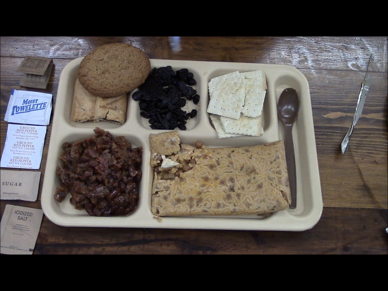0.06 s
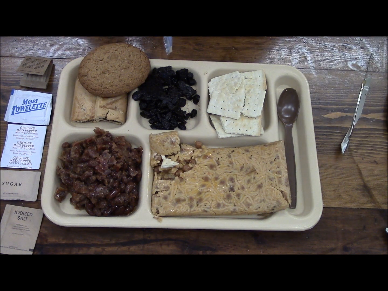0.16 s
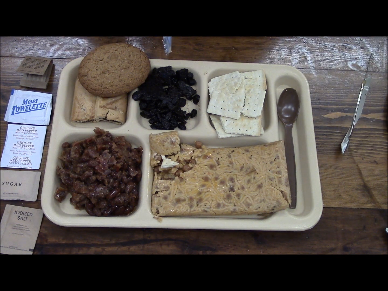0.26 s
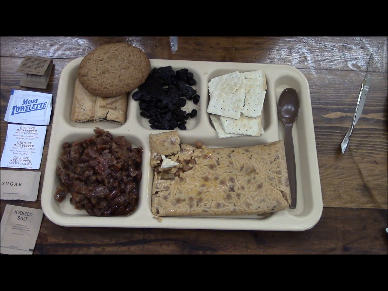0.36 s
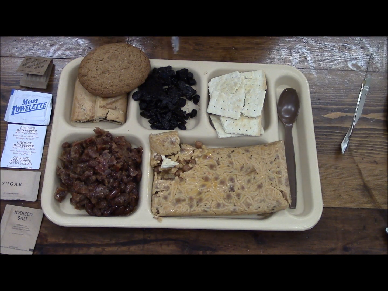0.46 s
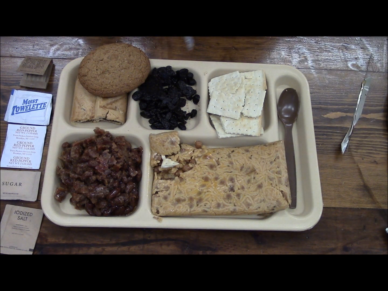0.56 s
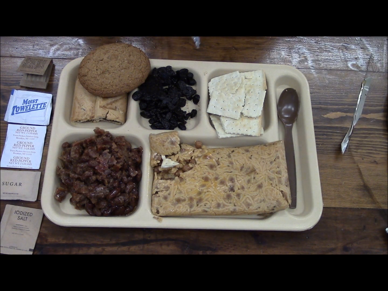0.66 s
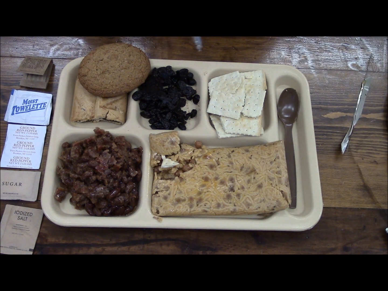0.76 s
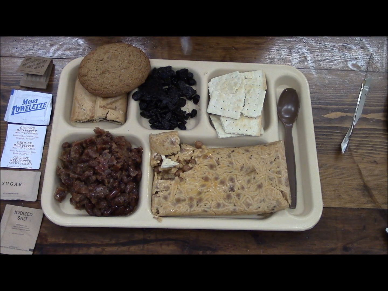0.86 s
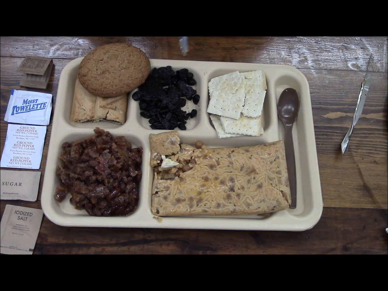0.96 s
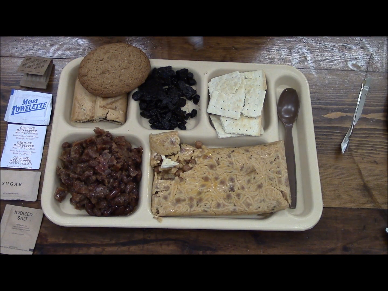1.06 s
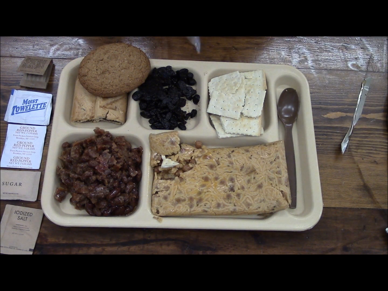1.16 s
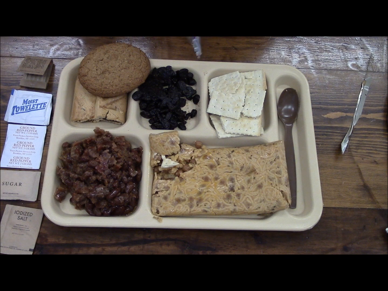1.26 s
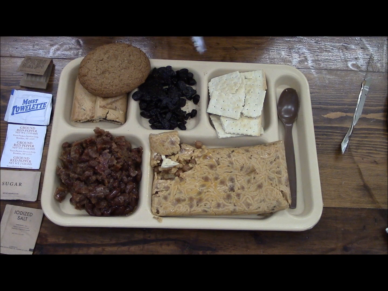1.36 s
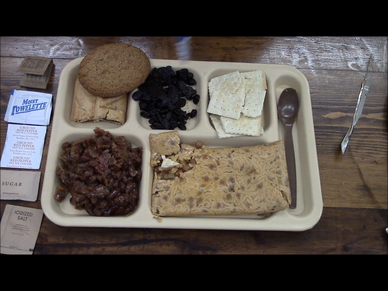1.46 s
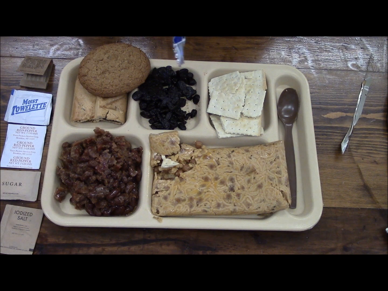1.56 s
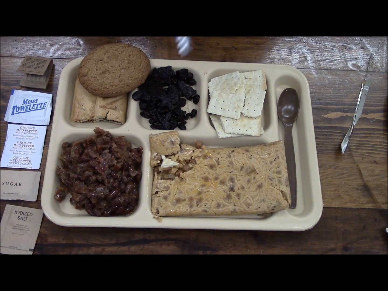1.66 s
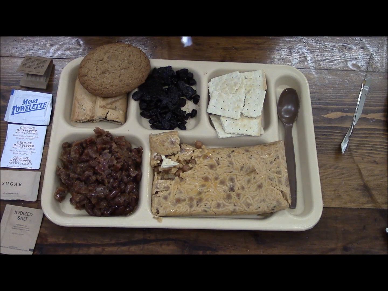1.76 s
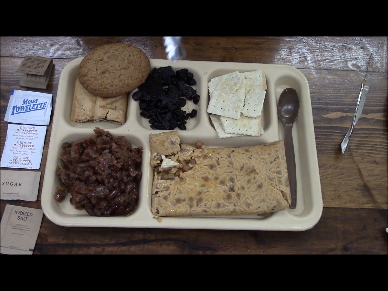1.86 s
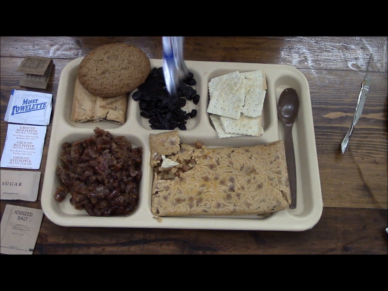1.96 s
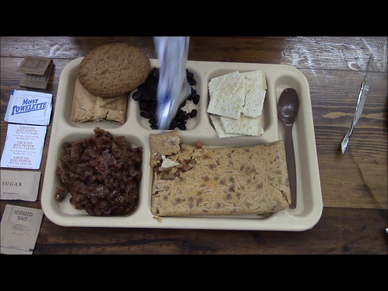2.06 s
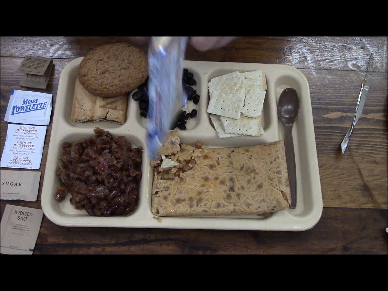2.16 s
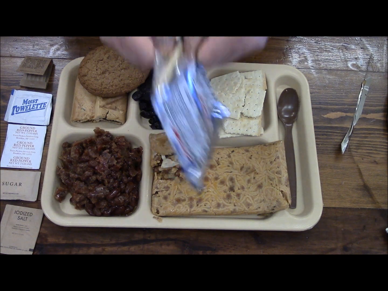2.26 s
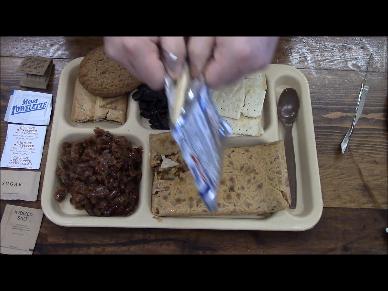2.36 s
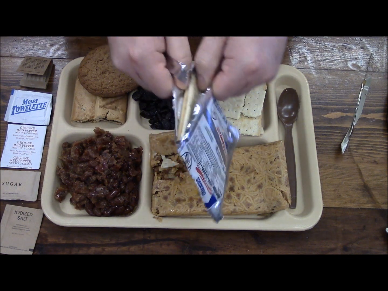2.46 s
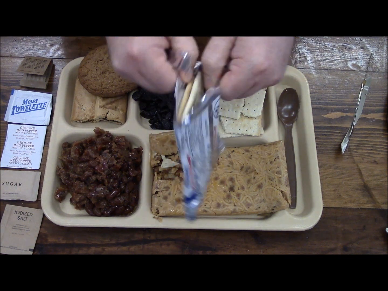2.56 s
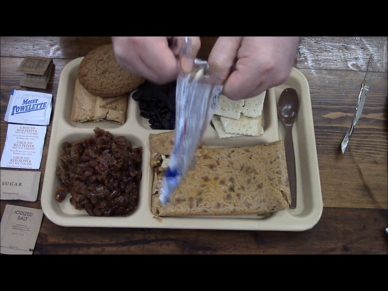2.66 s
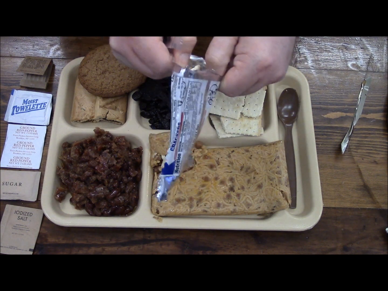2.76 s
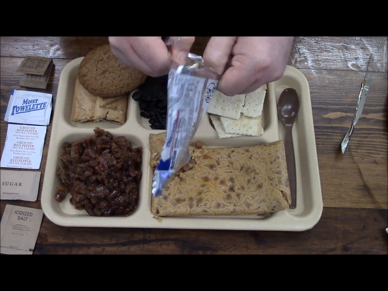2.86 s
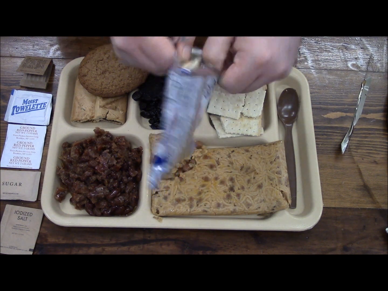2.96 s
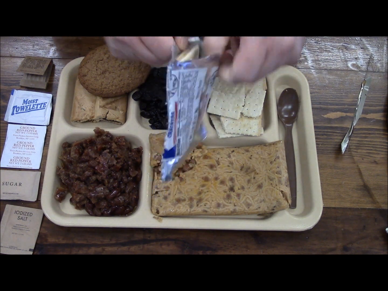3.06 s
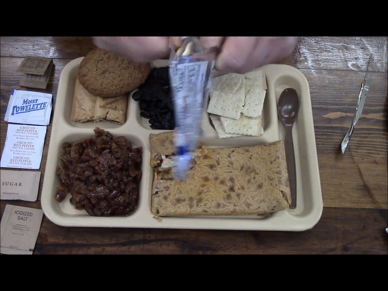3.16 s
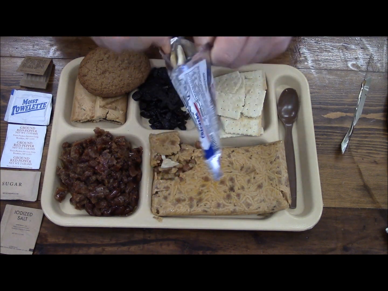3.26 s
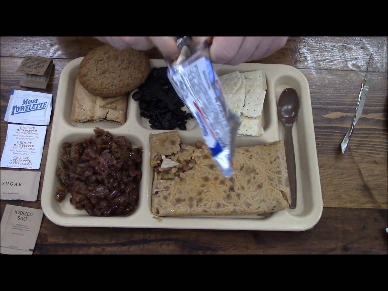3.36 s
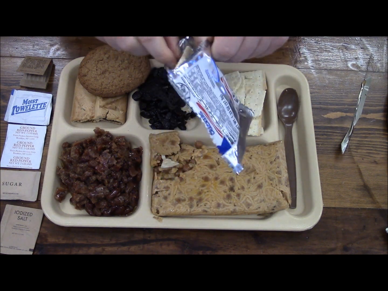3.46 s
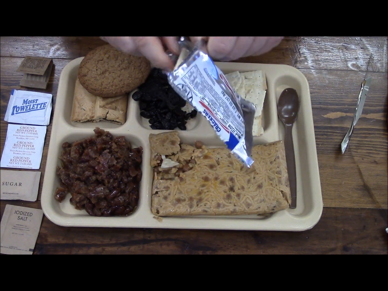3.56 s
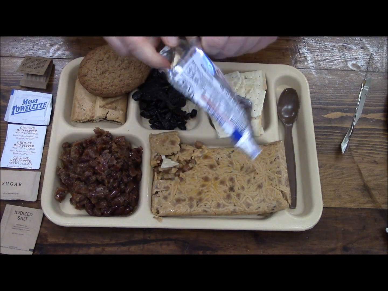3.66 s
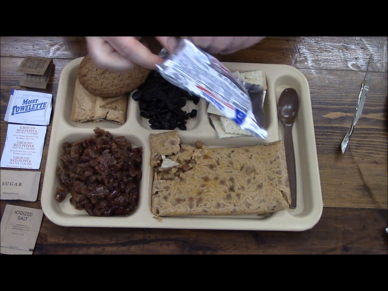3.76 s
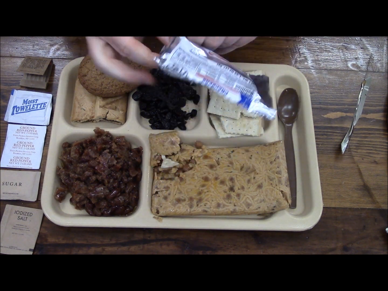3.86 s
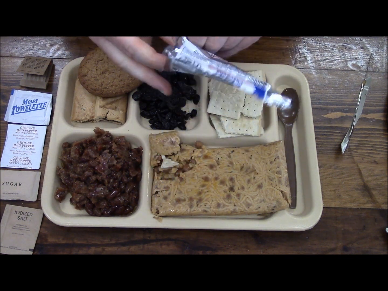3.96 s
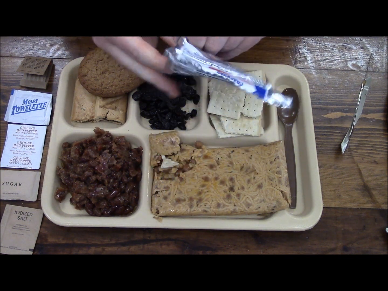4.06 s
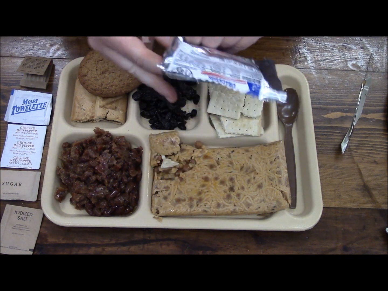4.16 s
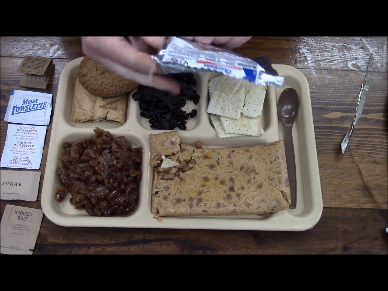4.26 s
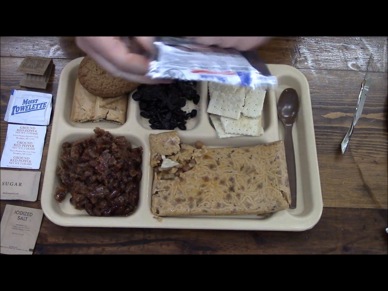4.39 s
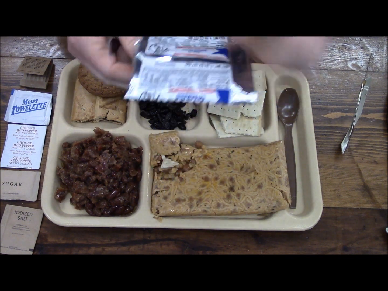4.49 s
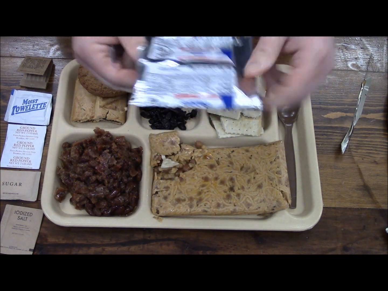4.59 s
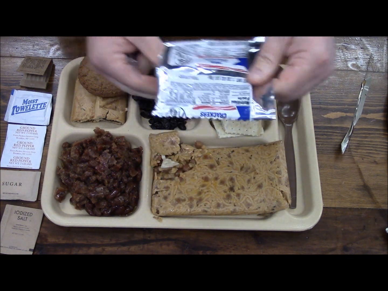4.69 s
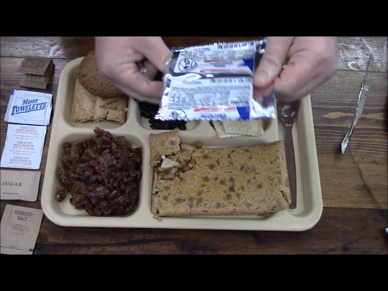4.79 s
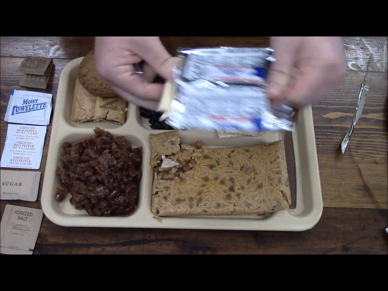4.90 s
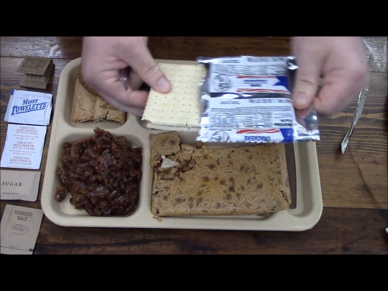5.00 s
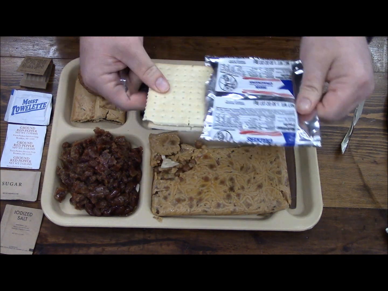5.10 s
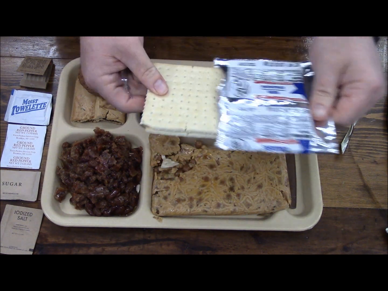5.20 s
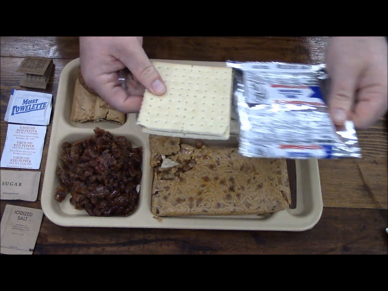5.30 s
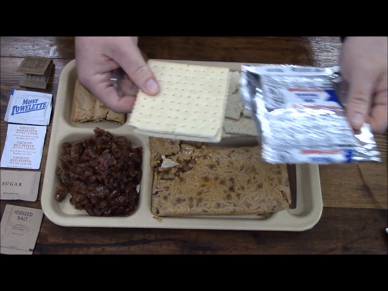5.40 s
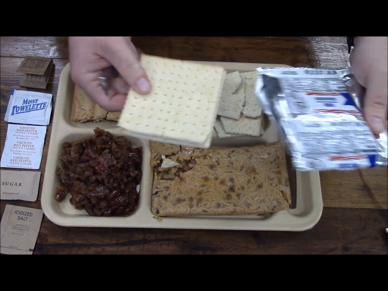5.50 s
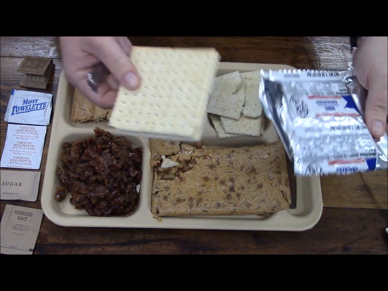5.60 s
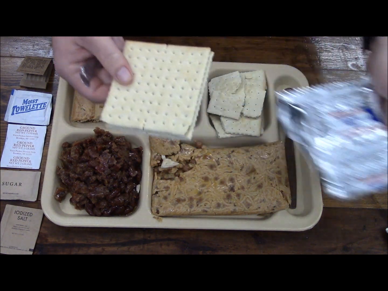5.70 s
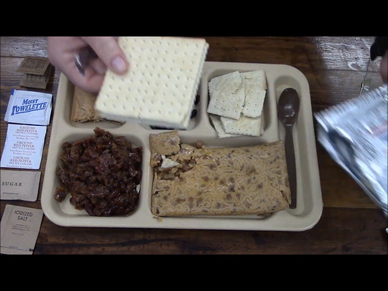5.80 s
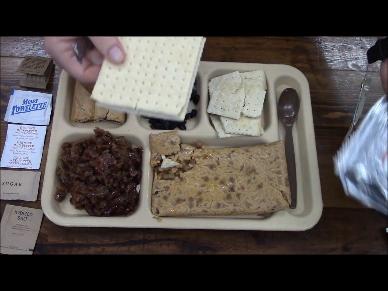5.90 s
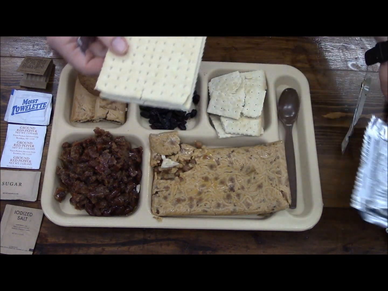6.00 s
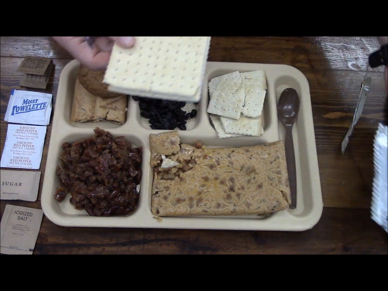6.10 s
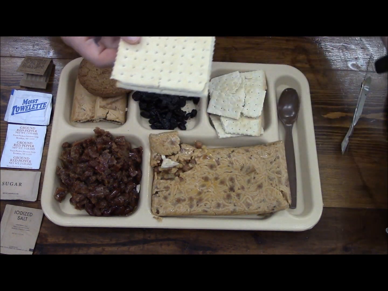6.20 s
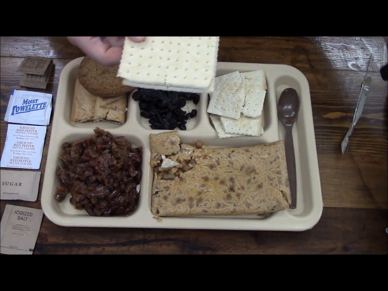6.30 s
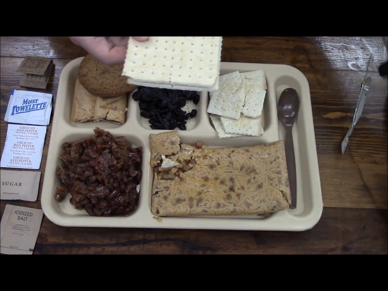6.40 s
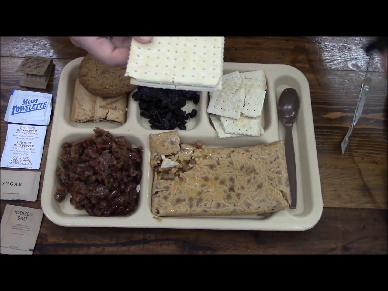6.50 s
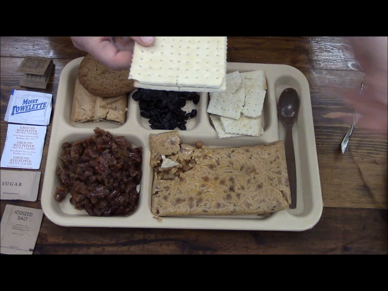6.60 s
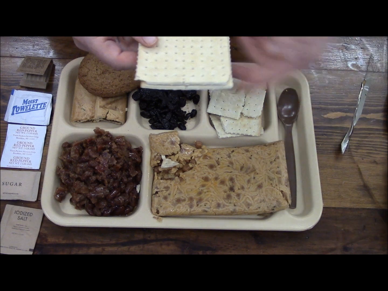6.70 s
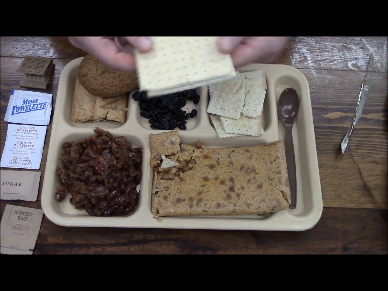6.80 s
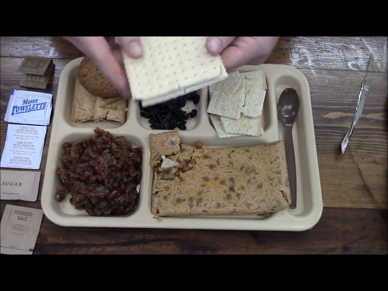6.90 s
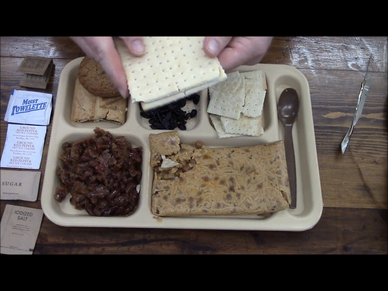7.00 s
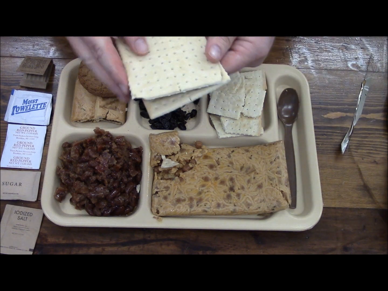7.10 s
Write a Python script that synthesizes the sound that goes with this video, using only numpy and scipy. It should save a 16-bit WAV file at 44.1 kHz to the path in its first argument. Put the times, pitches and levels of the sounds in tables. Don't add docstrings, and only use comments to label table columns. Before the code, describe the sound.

Close up, a foil packet is crinkled and torn in bright irregular snaps, emptied with a sharp crumple, then dropped aside in a quiet room.

```python
import sys
import numpy as np
from scipy import signal
from scipy.fft import rfft, irfft, next_fast_len
from scipy.io import wavfile
from scipy.ndimage import map_coordinates

SR = 44100
rng = np.random.default_rng(int(sys.argv[2]) if len(sys.argv) > 2 else 0)


def volts_from_decibels(level):
    exponent = np.asarray(level, float) / 20
    return 10 ** exponent


def unload_audio(sound):
    columns = np.transpose(np.atleast_2d(sound))
    steps = np.round(np.clip(columns, -1, 1) * 32767)
    wavfile.write(sys.argv[1], SR, steps.astype(np.int16))


N = 315124

# start_s, energy_db, ring_hz, sizzle_rel_db
EDGES = [(.4117, -38, 4200, 4), (.45, -36, 4630, -8), (.457, -35.5, 890, -11), (.5158, -41.5, 3200, -14),
         (1.6285, -33, 3680, 0), (1.6893, -42.5, 3930, 2), (2.0593, -40, 4160, 4.5),
         (2.5292, -28.5, 3100, -12.5), (2.5778, -15, 1270, -19), (2.6297, -20, 1760, -32),
         (2.646, -54, 1760, 10), (2.8006, -33.5, 2830, -3), (2.971, -32, 3960, -23),
         (4.6928, -34, 1000, -20), (4.7142, -29, 3270, -1.5), (4.7814, -39.5, 1730, -17),
         (4.799, -34.5, 3210, 1.5), (4.821, -34.5, 3320, -4), (4.8608, -41, 4070, -2),
         (5.0714, -37.5, 4830, 3.5), (5.1895, -38, 4770, 17.5), (5.2328, -31, 3180, -10),
         (5.3105, -36, 1046, 0.5), (6.4102, -26, 1535, -7.5), (6.444, -22.5, 1650, -14),
         (6.505, -30, 1620, -11), (6.5301, -34, 1620, -5), (6.5651, -35, 1575, -6),
         (7.0058, -42.5, 3320, 2.5)]
# start_s, energy_db, ring_hz, sizzle_rel_db
FOLDS = [(.045, -42.5, 3630, -13), (.6745, -26.5, 4030, -7), (1.771, -32, 3500, -23),
         (1.8912, -17.5, 3500, -16), (1.8965, -20, 1020, -5.5), (1.9059, -20.5, 684, -17),
         (2.0945, -36, 1470, 4), (2.1524, -42, 1350, -15), (2.274, -48, 3720, 10),
         (2.5621, -19.5, 1890, -13.5), (2.61, -10.5, 1610, -9.5), (2.7283, -38, 4320, -0.5),
         (2.9851, -30, 1730, -8), (3.4845, -44.5, 3140, 9.5), (3.6661, -22.5, 1018, -37),
         (3.8075, -10.5, 3470, -4.5), (4.0905, -35.5, 3400, 0), (4.106, -26, 2980, -2.5),
         (4.129, -26, 3100, -31), (4.1343, -25.5, 700, -10), (4.3699, -30.5, 2910, 3),
         (4.6803, -27, 2580, 2), (4.7452, -33, 2700, -11), (4.8528, -36.5, 4770, 13.5),
         (5.2396, -31, 2150, 3), (6.289, -42, 3080, -0.5), (6.3684, -40.5, 2760, 8), (6.4411, -37, 1430, 4),
         (6.5966, -41, 1610, -6.5), (6.716, -38, 3420, -9)]
# start_s, energy_db, ring_hz, sizzle_rel_db
DENTS = [(.4652, -33, 1390, -11), (.621, -39, 2600, -14), (.7992, -39.5, 960, -21), (1.042, -45, 1000, -19),
         (1.082, -33, 890, -21), (1.26, -46, 4800, 1.5), (1.371, -39.5, 603, -55),
         (1.8493, -28.5, 700, -24), (2.0662, -43, 3260, -12), (2.087, -29.5, 1160, -20),
         (2.196, -28.5, 1170, -50), (2.5209, -31.5, 1260, -11), (2.5483, -20.5, 1030, -15),
         (2.5836, -18, 1170, -28), (2.9921, -35.5, 3100, 7.5), (3.0175, -29.5, 1350, -33),
         (3.0339, -38, 1790, 1), (3.2024, -30.5, 1000, -20), (3.5107, -35.5, 930, -21),
         (3.534, -47.5, 3140, 12.5), (3.8052, -30, 2100, -19), (4.0904, -40, 830, -2),
         (4.19, -36.5, 700, -31), (4.2349, -41.5, 676, 1.5), (4.2426, -39, 730, -4.5),
         (4.281, -53, 1080, 12), (4.5805, -36.5, 1070, -8), (4.6184, -33.5, 834, -4),
         (4.6852, -36, 1050, -26), (5.265, -41, 1940, 0)]
# start_s, energy_db, ring_hz, sizzle_rel_db, pouch_rel_db
RIPS = [(0.8367, -29.5, 3300, -6.5, 1), (1.1848, -41, 3240, -3.5, -18), (1.463, -40, 1030, -13, 0.5),
        (2.621, -28, 1830, -37, -14), (3.706, -44, 920, 6, -11), (4.339, -28.5, 3400, 0, -6.5),
        (4.8688, -27, 870, 3, -17), (4.9184, -31, 2070, -3, -16), (4.9443, -29.5, 3200, 6, 2.5),
        (5.1006, -39.5, 2150, 4.5, -18), (5.1623, -33.5, 1020, -35, -4), (5.359, -54, 2800, 2, -8),
        (5.637, -47, 1360, -5.5, -24), (5.95, -52.5, 2200, -13, -10), (6.329, -24.5, 3130, -3, 0),
        (6.4545, -34, 1510, -4, 2), (6.806, -52, 4700, 10, -7)]
# start_s, peak_db
TICKS = [(0.1994, -52), (0.3165, -49), (0.7711, -48), (0.88, -40.5), (1.2346, -42), (1.579, -49),
         (1.9892, -37), (2.1508, -35), (2.333, -38), (2.4027, -40.5), (2.775, -37.5), (3.0815, -40),
         (3.174, -35), (3.3007, -37), (3.3882, -42.5), (3.623, -42), (4.449, -44.5), (4.5044, -55),
         (4.544, -38.5), (4.5567, -48), (4.6047, -40), (5.029, -39), (5.1394, -42.5), (6.684, -48.5),
         (7.1008, -51)]
# start_s, energy_db, ring_hz, sizzle_rel_db
FLICKS = [(0.255, -55.5, 3000, 7), (.4222, -61, 4500, 9), (.5395, -48, 3100, -14), (.807, -54, 4500, 5),
          (.834, -39, 3220, -13), (0.8673, -41, 4450, 6.5), (1.0587, -53, 3200, -14),
          (1.1085, -46, 4000, -7), (1.134, -49, 3300, -14), (1.1415, -51, 3800, -13), (1.176, -49, 4000, 1),
          (1.182, -44, 4300, -4.5), (1.598, -45, 2980, -18), (1.619, -46, 4800, 2), (1.756, -45, 2900, -15),
          (1.781, -37.5, 3380, -10), (1.832, -52, 4500, 3.5), (1.982, -52, 4500, 6),
          (2.024, -56, 4500, 8.5), (2.067, -40.5, 3230, 5), (2.2085, -42, 3500, -13),
          (2.222, -44, 3300, -14), (2.2822, -45.5, 4500, 5.5), (2.304, -54, 4500, 9.5),
          (2.371, -62, 4500, 3), (2.417, -56, 4400, 2), (2.538, -59, 3000, 7.5), (2.7148, -47, 4000, 2),
          (2.7854, -49, 3200, -10), (2.912, -57.5, 4500, 12), (2.926, -48, 3960, -10),
          (3.152, -52, 4500, -8), (3.183, -48, 4800, 6), (3.284, -50, 3500, -10), (3.4078, -60, 4000, 13),
          (3.5275, -56, 4500, 7), (3.650, -56, 3500, 0), (4.137, -29, 3050, -8.5), (4.3135, -47, 3800, 1),
          (4.424, -48, 3200, -8), (4.453, -59, 4500, 5), (4.5875, -38.5, 1470, -8),
          (4.6245, -41.5, 3500, 6.5), (4.836, -42, 4500, 1.5), (4.849, -40, 4700, 6.5),
          (5.067, -41, 2750, -6), (5.281, -42, 3200, -9), (6.4195, -47, 4500, 6), (6.466, -45, 4500, 7),
          (6.6057, -54, 4030, 0)]
# start_s, energy_db, ring_hz, sizzle_rel_db
CRACKS = [(1.9079, -19, 3420, -9.5), (2.5846, -18.5, 1330, -6.5), (2.6097, -26, 1910, -7),
          (2.986, -34, 2800, -8), (3.202, -34.5, 2600, -13), (4.1074, -25.5, 2940, -13),
          (4.245, -37, 3000, -3), (4.6806, -30.5, 3030, -16), (4.8542, -33, 4800, 9.5),
          (4.864, -36, 4500, 6), (4.9165, -34, 2000, -4), (4.9487, -28.5, 910, -10.5),
          (5.072, -43.5, 4840, 9), (5.1896, -32, 4800, 9.5), (.4122, -37.5, 4500, 9),
          (4.7146, -36.5, 3200, 5), (4.3702, -34, 4530, 5.5), (3.485, -50, 4480, 11),
          (6.4408, -34.5, 4480, 10), (6.7158, -41, 3540, -8)]
# start_s, energy_db, ring_hz
DIMPLES = [(.2515, -54, 1200), (0.769, -49, 1450), (1.2365, -49, 900), (1.2843, -46.5, 1250),
           (1.6608, -48, 1000), (2.1398, -46, 1350), (2.2398, -43.5, 900), (2.7703, -38, 1020),
           (2.896, -48, 1000), (2.954, -45, 750), (3.115, -53, 900), (3.314, -45, 1190),
           (3.361, -46.5, 1100), (3.642, -46.5, 1200), (3.9985, -49.5, 1200), (3.667, -21.5, 2800),
           (4.077, -44, 900), (4.137, -30.5, 720), (4.685, -36, 900), (5.163, -42.5, 1200),
           (5.125, -46, 2200), (5.206, -41, 2300), (2.6, -29, 750), (2.556, -30.5, 750), (2.64, -30, 1900),
           (2.656, -36.5, 1900), (2.675, -39, 1950), (4.2223, -48, 900), (4.5688, -49, 1000),
           (4.7347, -46, 1200), (5.415, -57, 1100), (5.516, -62, 2300), (6.05, -62, 2350),
           (6.15, -62.5, 2700), (6.62, -55, 1500)]
# freq_hz, density_db
FOIL_COLOUR = [(59, -65), (100, 9.5), (489, -1.5), (1120, -7), (1740, -9), (2390, -10.5), (3080, -9),
               (5340, -13.5), (10100, -16.5), (15700, -26.5)]
# freq_hz, width_hz, level_db
FACES = [(630, 90, -2), (3400, 400, -6)]
# peak_s, rustle_db, swell_s, fade_s, sizzle_rel_db
HAND_STROKES = [(.33, -54.5, 0.069, 0.022, -7), (.53, -50, 0.084, 0.026, -7.5),
                (.865, -43.5, 0.064, 0.057, -6), (.95, -53, .1, 0.17, -6.5),
                (1.2, -59, 0.14, 0.47, -0.5), (1.43, -50, 0.045, 0.12, -6),
                (1.63, -49.5, 0.11, 0.29, -10), (1.95, -53, .05, 0.27, -3),
                (2.083, -41.5, 0.026, 0.012, -6), (2.3, -53.5, 0.98, 0.24, -3.5),
                (2.598, -39, 0.05, 0.064, -9), (2.78, -51.5, 0.086, 0.011, 1.5),
                (3.0, -42.5, 0.077, 0.042, -2), (1.83, -57.5, 0.037, 0.036, 3),
                (2.14, -55, 0.026, 0.036, -4), (2.28, -56.5, 0.056, 0.019, 7),
                (2.41, -48.5, .015, .03, -8.5), (2.515, -50.5, .035, .01, -6),
                (.21, -57.5, .03, .04, -2), (3.178, -53.5, .008, 0.0091, 8.5),
                (3.19, -57, 0.43, 0.028, -1.5), (3.37, -53.5, 0.17, 0.029, -2.5),
                (3.5, -50, .08, 0.059, -10), (3.69, -53, 0.06, 0.083, -6.5),
                    (3.83, -49, 0.017, 0.15, -7), (4.119, -41, 0.073, 0.055, -11),
                    (4.352, -38.5, 0.072, 0.052, -8.5), (4.58, -52.5, 0.0078, 0.027, 0),
                    (4.8, -47.5, 0.018, .05, 0), (4.098, -44.5, .012, .012, 5),
                    (4.897, -36.5, .03, .02, -1.5), (4.63, -43.5, 0.042, 0.091, -8),
                    (4.86, -42.5, 0.035, 0.05, 11), (4.932, -27, 0.069, 0.046, -3.5),
                    (5.13, -42, 0.052, 0.12, -8), (5.125, -52, 0.033, 0.031, 8.5),
                    (5.23, -40.5, 0.11, 0.03, -0.5), (6.35, -40.5, 0.0098, 0.11, -10.5),
                    (6.5, -47.5, 0.12, 0.11, -7.5), (6.8, -62, 0.04, 0.033, 8), (7.04, -63, 0.21, 0.1, 1.5)]
# time_s, rustle_db
GRIP = [
    (0, -58),
    (2, -71),
    (4.5, -61),
    (5.4, -69.5),
    (5.64, -60),
    (5.72, -67.5),
    (6.15, -69.5),
    (6.7, -91),
    (7.15, -87),
]
# time_s, level_db
SLIDE = [
    (5.3, -90),
    (5.36, -63),
    (5.52, -63),
    (5.57, -69),
    (5.66, -66),
    (5.85, -73),
    (6.1, -76),
    (6.2, -69),
    (6.28, -72),
    (6.32, -90),
]
# freq_hz, width_hz, level_db
CRACKER_MODES = [(1000, 200, -4), (1500, 320, 0), (3600, 150, -4)]
# start_s,
# peak_db, pitch_hz
THUMPS = [(0.349, -54, 247), (0.515, -50, 455), (0.564, -48.5, 242), (1.369, -49.5, 520), (1.465, -49, 453),
          (3.666, -29.5, 1020), (3.81, -30, 949), (2.09, -47, 330), (2.2, -47, 362), (1.895, -32, 323),
          (3.172, -37, 297), (3.314, -47.5, 322), (3.47, -39.5, 256), (3.702, -40, 323), (3.74, -46.5, 194),
          (3.806, -31, 398), (4.188, -44.5, 385), (6.24, -58, 853), (6.716, -53, 418), (6.948, -57, 472),
          (7.004, -51, 370)]
# start_s, end_s, start_hz, end_hz, level_db
SQUEAKS = [
    (1.325, 1.375, 11500, 12200, -70),
    (1.47, 1.55, 10500, 10750, -73),
    (1.73, 1.775, 11300, 11600, -72),
    (5.46, 5.51, 11000, 10400, -76),
    (6.05, 6.2, 5600, 5600, -80),
    (6.64, 6.71, 5600, 5600, -75),
]
# time_s, difference_db
PAN = [
    (0, -.3),
    (3.5, -.2),
    (3.8, -1.2),
    (4.0, -.1),
    (6.2, -.1),
    (6.3, -3),
    (6.6, -3),
    (6.7, -.2),
]
# freq_hz, t60_s
ROOM_DECAY = [(200, 0.14), (1400, .13), (5000, 0.13), (14000, 0.072)]
# freq_hz, level_db
ECHO_COLOUR = [(200, 0.5), (2000, -1), (5000, -7), (14000, -3.5)]
# freq_hz, density_db
HISS_COLOUR = [(15, -48), (25, -18), (64, -14.5), (113, -6.5), (424, -4.5), (472, -11.5), (951, -12.5),
               (5640, -26), (10500, -30), (15700, -39)]
# freq_hz, likeness (0 to 1)
HISS_LIKENESS = [(60, .93), (400, .5), (1700, .72), (4500, .88), (9000, .985)]
# time_s, level_db
HUM = [
    (0, -78),
    (1.1, -80),
    (1.6, -73),
    (4.1, -68),
    (5, -72),
    (7.14, -72),
]


def unit(x):
    return x / np.sqrt(np.mean(x ** 2, axis=-1, keepdims=True) + 1e-20)


def along(points, hz):
    f, v = np.transpose(points)
    return np.interp(np.log(hz + 1), np.log(f + 1), v)


def automation(points):
    s, v = np.transpose(points)
    return np.interp(np.arange(N) / SR, s, v)


def wobble(rate):
    knots = rng.standard_normal(int(N * rate / SR) + 4)
    return map_coordinates(knots, [np.arange(N) * rate / SR])


def filtered(x, response):
    m = next_fast_len(x.shape[-1] + 2048)
    return irfft(rfft(x, m) * response(np.fft.rfftfreq(m, 1 / SR)), m)[..., :x.shape[-1]]


def softened(x, corner_hz):
    return filtered(x, lambda f: 1 / np.sqrt(1 + (f / corner_hz) ** 4))


def resonances(modes):
    return lambda f: sum(volts_from_decibels(db) * 1j * f * w / (c * c - f * f + 1j * f * w) for c, w, db in modes)


def laid(pieces, starts):
    line = np.zeros(pieces.shape[1:-1] + (N + 2 * SR,))
    for piece, start in zip(pieces, starts):
        line[..., start:start + piece.shape[-1]] += piece
    return line[..., :N]


def registers(x):
    low = lambda hz: 1 / (1 + (hz / 900) ** 4)
    high = lambda hz: 1 - 1 / (1 + (hz / 5000) ** 6)
    middle = lambda hz: 1 - low(hz) - high(hz)
    pouch = lambda hz: low(hz) * hz ** 2 / (hz ** 2 + 330 ** 2)
    colour = lambda hz: volts_from_decibels(along(FOIL_COLOUR, hz))
    return [unit(filtered(x, lambda hz: colour(hz) * share(hz))) for share in (middle, pouch, high)]


def creases():
    rows = [(*row, -19, 4.23) for row in EDGES]
    rows += [(*row, -9, 4.63) for row in FOLDS]
    rows += [(*row, 0, 5) for row in DENTS]
    rows += [(*row, 27) for row in RIPS]
    rows += [(s, peak_db - 8.5, 3980, 1.5, -19, 4.4) for s, peak_db in TICKS]
    return np.transpose(rows)[:, :, None]


def fine_creases():
    rows = [(*row, -19, 2.7) for row in FLICKS]
    rows += [(*row, -19, 1.1) for row in CRACKS]
    rows += [(*row, -30, 0, 3.4) for row in DIMPLES]
    return np.transpose(rows)[:, :, None]


def snaps(columns, ring_db=0, far_ring_db=-6, face_db=6.5, sharpness=6.5, spiky_db=2.4, aside_s=6.25):
    s, db, ring_hz, sizzle_db, pouch_db, ms = columns
    t = np.arange(1536) / SR
    u = t / (np.clip(ms, .5, 16) / 1000)
    lead = ((0, 0), (128, 0))
    cracks = rng.standard_normal((len(s), len(t)))
    cracks = cracks * volts_from_decibels(np.minimum(spiky_db * rng.exponential(1, cracks.shape), 8))
    cascade = cracks * u ** 0.47 * np.exp(-2.2 * u * u)
    mid, low, high = registers(np.pad(cascade, lead))
    facet = lambda f: 1j * f / (ring_hz ** 2 - f ** 2 + 1j * f * ring_hz / sharpness)
    on_face = np.abs(ring_hz - 1680) < 190
    ring = volts_from_decibels(face_db * on_face) * unit(filtered(mid, facet))
    blunt_db = np.minimum(sizzle_db, 0)
    mid = unit(softened(mid, 16000 * volts_from_decibels(0.5 * blunt_db)))
    high = high * np.pad(np.exp(-2.4 * u), lead, 'edge')
    high = unit(softened(high, 13000 * volts_from_decibels(0.61 * blunt_db - 4.8 * (s > aside_s))))
    near = unit(mid + volts_from_decibels(ring_db) * ring)
    far = unit(mid + volts_from_decibels(np.where(on_face, ring_db, far_ring_db)) * ring)
    rest = volts_from_decibels(pouch_db - 4.5) * low + volts_from_decibels(sizzle_db - 3.5) * high
    bursts = volts_from_decibels(db - 14.5) * (near + rest)
    sent = volts_from_decibels(db - 14.5) * (far + rest)
    starts = np.maximum(np.round(s[:, 0] * SR).astype(int) - 140, 0)
    return laid(bursts, starts), laid(room(sent, gap=0.00089), starts)


def handling():
    now = np.arange(N) / SR
    coarse = now[::64]
    power = volts_from_decibels(automation(GRIP) + np.array([[0], [1], [-6.5]]))[:, ::64] ** 2
    power[1] += volts_from_decibels(-68.5) ** 2
    for s, db, swell, fade, sizzle_db in HAND_STROKES:
        away = np.maximum((s - coarse) / abs(swell), (coarse - s) / abs(fade))
        power += volts_from_decibels(db - 12 * away + np.array([[0], [-3.5], [sizzle_db]])) ** 2
    return [np.interp(now, coarse, 10 * np.log10(p)) for p in power]


def rustle(per_second=1700, spread_db=10.0, own_db=6, life_s=0.0016, bed=0.052):
    levels = handling()
    effort = np.clip((levels[0] + 72) / 22, 0, 1)
    crackles = rng.random(N) < per_second * volts_from_decibels(2.2 * wobble(25)) / SR
    sizes_db = np.minimum(spread_db * rng.exponential(1, N), 13) + own_db * rng.standard_normal((3, N))
    gates = signal.lfilter([1], [1, -np.exp(-1 / (life_s * SR))], crackles * volts_from_decibels(sizes_db))
    share = effort / (effort + bed)
    mix = np.sqrt(share) * unit(gates) + np.sqrt(1 - share)
    noise = rng.standard_normal(N)
    bands = registers(noise + filtered(noise, resonances(FACES)))
    direct = sum(volts_from_decibels(db - 6.5 + 1.76 * wobble(30)) * gate * x for db, gate, x in zip(levels, mix, bands))
    pieces = np.pad(direct, (0, -N % 8192)).reshape(-1, 8192)
    return direct, laid(room(pieces, gap=0.0029), np.arange(len(pieces)) * 8192)


def crackers():
    whisper = unit(filtered(rng.standard_normal(N), resonances(CRACKER_MODES)))
    return volts_from_decibels(automation(SLIDE) + 3.9 * wobble(12)) * whisper


def packet_thumps(t60_s=.085, rise_s=.004):
    landing = (6.33, -47.5, 146)
    s, db, hz = np.transpose(THUMPS + [landing])[:, :, None]
    t = np.arange(SR // 5) / SR
    stray = np.cumsum(rng.standard_normal((len(s), len(t))), axis=1) * .065
    envelope = volts_from_decibels(db + 5.0 - 60 * t / t60_s) * (1 - np.exp(-t / rise_s))
    pushes = envelope * np.sin(2 * np.pi * hz * t + stray)
    return laid(pushes, np.round(s[:, 0] * SR).astype(int))


def finger_squeaks():
    line, now, waver = np.zeros(N), np.arange(N) / SR, wobble(60)
    for start, end, first_hz, last_hz, db in SQUEAKS:
        way = np.clip((now - start) / (end - start), 0, 1)
        pitch_hz = first_hz + (last_hz - first_hz) * np.sqrt(way) + 25 * waver
        swell = np.abs(np.sin(np.pi * way)) ** 0.4 * (way < 1)
        line += volts_from_decibels(db + 2.5 * waver) * swell * np.sin(2 * np.pi * np.cumsum(pitch_hz) / SR)
    return line


def room(bursts, gap):
    noise = rng.standard_normal((len(bursts), 2, SR // 7))
    hz, t, z = signal.stft(noise, SR, nperseg=128)
    fade = volts_from_decibels(along(ECHO_COLOUR, hz)[:, None] - 60 * t / along(ROOM_DECAY, hz)[:, None])
    tails = signal.istft(z * fade, SR, nperseg=128)[1]
    build_up = 1 - np.exp(-(np.arange(tails.shape[-1]) / SR / gap) ** 2)
    return signal.fftconvolve(bursts[:, None], tails * build_up / 20, axes=2)


def heard(direct, tails, wet_db, side_db, ports_db):
    mid = filtered(direct + volts_from_decibels(wet_db) * tails[0], lambda hz: hz ** 4 / (hz ** 4 + 190 ** 4))
    treble = filtered(mid, lambda hz: hz ** 2 / (hz ** 2 + 2500 ** 2))
    scatter = rng.standard_normal(64) * np.exp(-np.arange(64) / 5) / 1.39
    side = volts_from_decibels(wet_db + side_db) * tails[1]
    side = side + volts_from_decibels(ports_db + 5.7 * wobble(9)) * np.convolve(treble, scatter)[:N]
    side = side + np.tanh((automation(PAN) - .6) / 17.4) * treble
    return np.array([mid + side, mid - side])


def machine_hum(hum_hz=66):
    phase = 2 * np.pi * np.cumsum(hum_hz + 2.2 * wobble(9.9)) / SR
    return volts_from_decibels(automation(HUM) - .5 + 3 * wobble(13)) * np.sin(phase)


def room_tone(level_db=-64):
    turn = lambda hz: np.arccos(np.clip(along(HISS_LIKENESS, hz), -1, 1)) / 2
    shares = lambda hz: np.array([np.cos(turn(hz)), np.sin(turn(hz))])
    pair = rng.standard_normal((2, N))
    mid, side = filtered(pair, lambda hz: volts_from_decibels(along(HISS_COLOUR, hz)) * shares(hz))
    hum = machine_hum()
    hiss = volts_from_decibels(level_db) * volts_from_decibels(wobble(7.9)) * unit(np.array([mid + side, mid - side]))
    return hiss + hum


def scene():
    large_snaps = heard(*snaps(creases()), wet_db=-4, side_db=-22.0, ports_db=-26.5)
    rustling = heard(*rustle(), wet_db=-4.0, side_db=-27.5, ports_db=-22.5)
    rest = crackers() + packet_thumps() + finger_squeaks() + room_tone()
    fine_snaps = heard(*snaps(fine_creases()), wet_db=-6, side_db=-22, ports_db=-23)
    return large_snaps + rustling + rest + fine_snaps


def band_limit(x):
    return signal.sosfilt(signal.butter(12, 16640, fs=SR, output="sos"), x)


def record(dry):
    mix = filtered(dry, lambda hz: np.where(hz < 15750, 1, volts_from_decibels(-29.5)))
    return band_limit(mix)


dry = scene()
out = record(dry)
unload_audio(out)
```